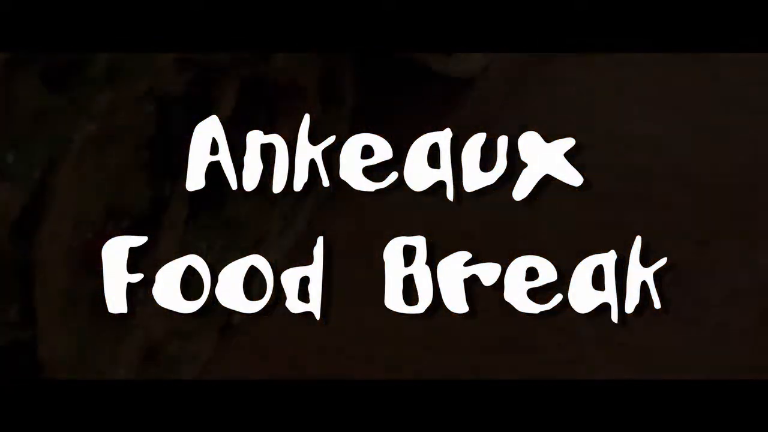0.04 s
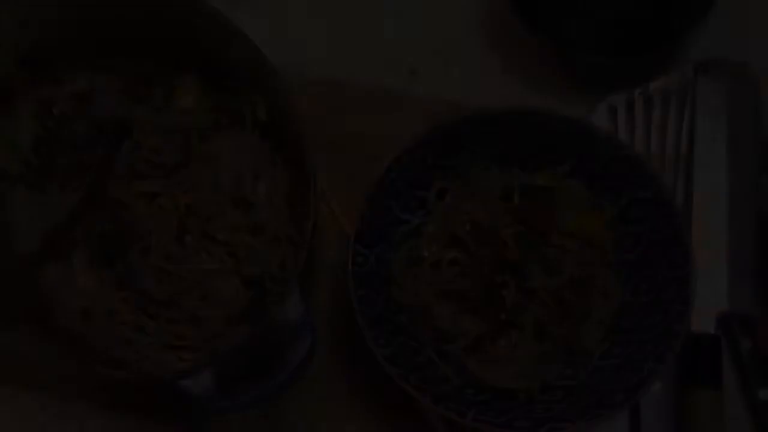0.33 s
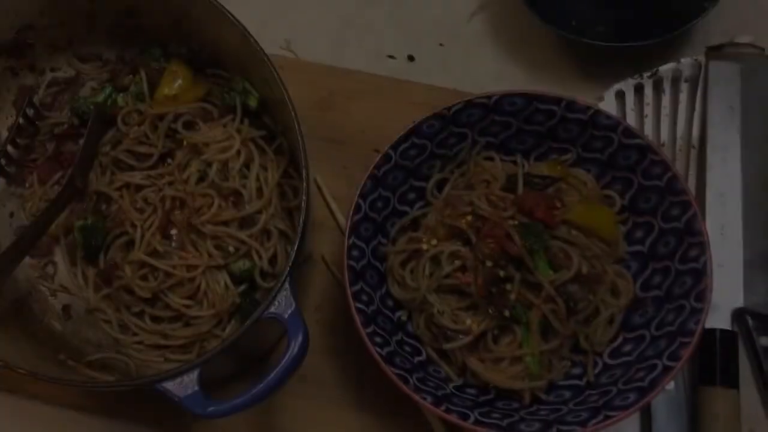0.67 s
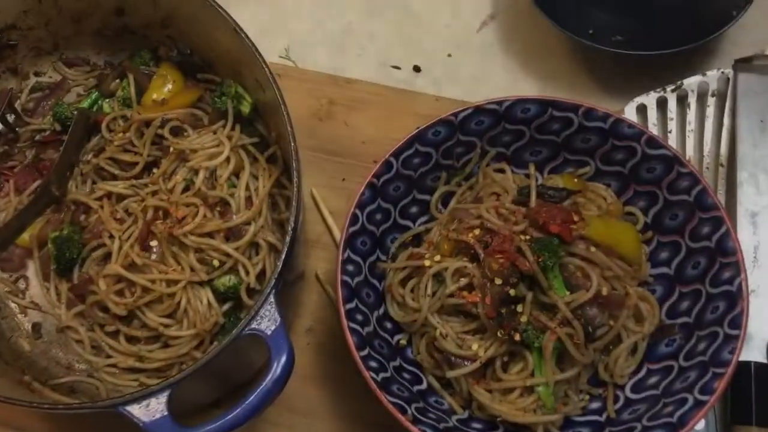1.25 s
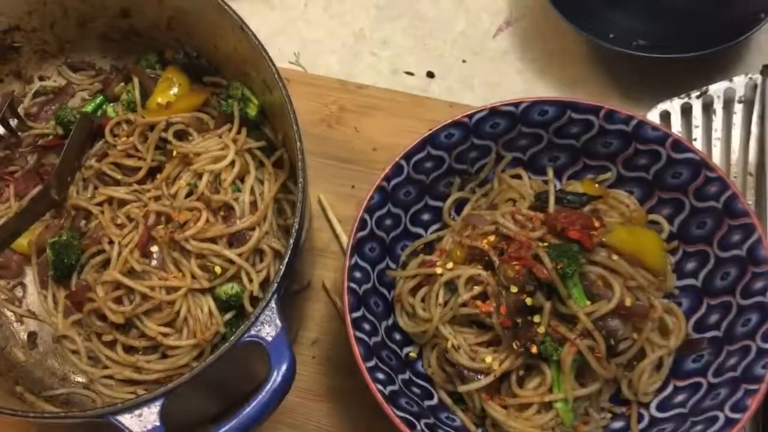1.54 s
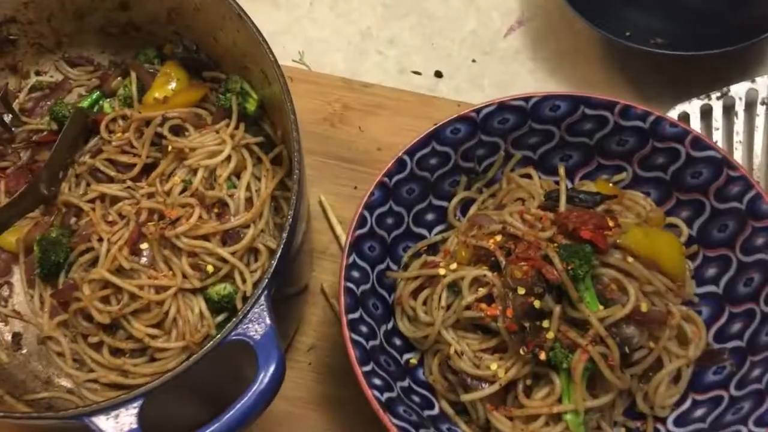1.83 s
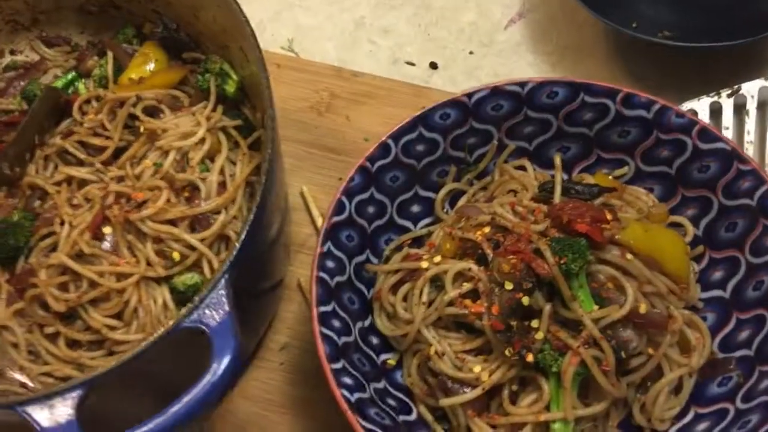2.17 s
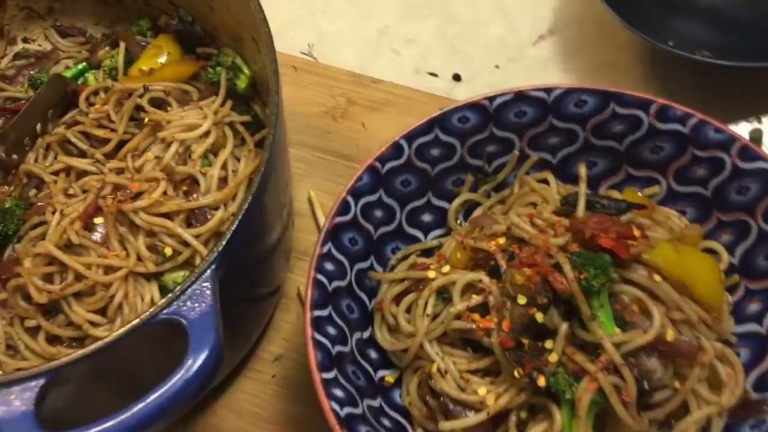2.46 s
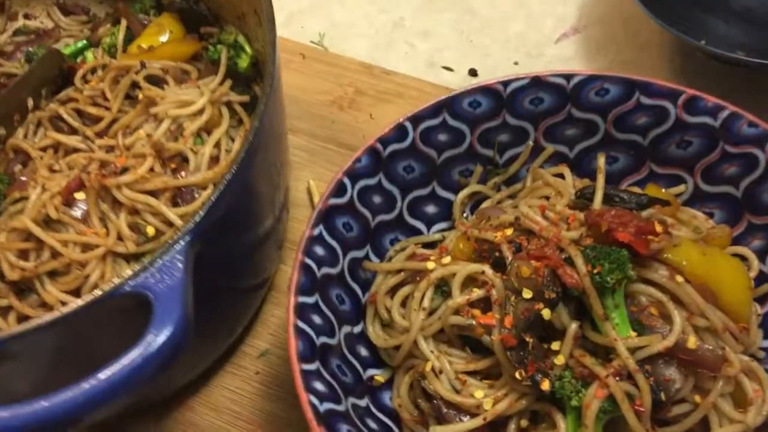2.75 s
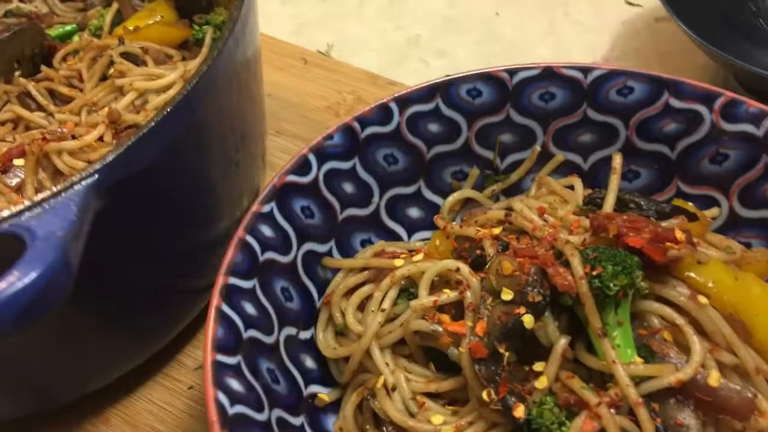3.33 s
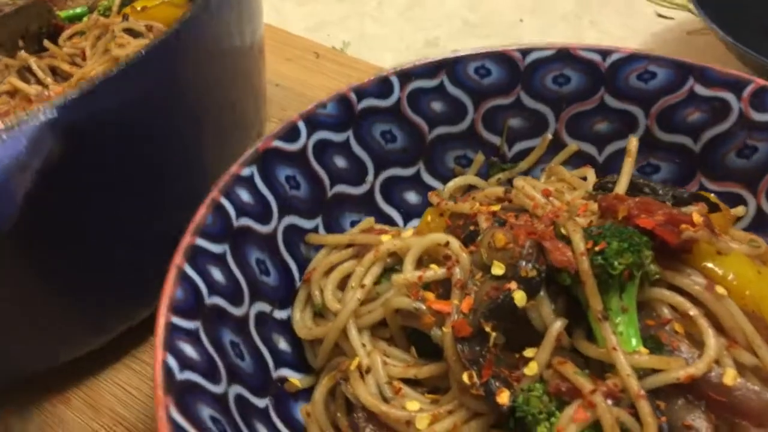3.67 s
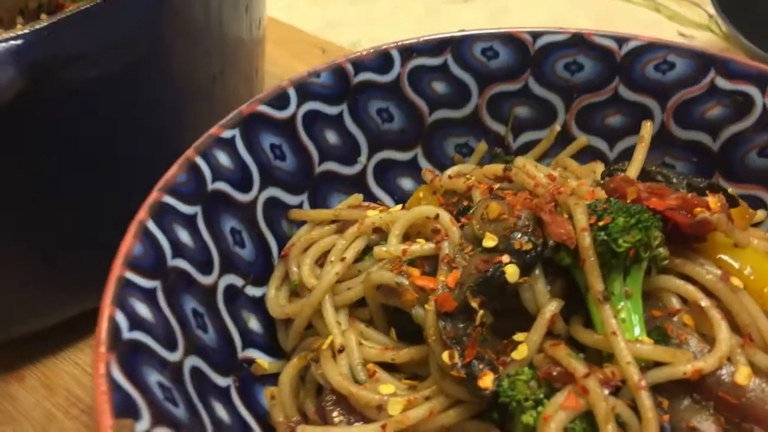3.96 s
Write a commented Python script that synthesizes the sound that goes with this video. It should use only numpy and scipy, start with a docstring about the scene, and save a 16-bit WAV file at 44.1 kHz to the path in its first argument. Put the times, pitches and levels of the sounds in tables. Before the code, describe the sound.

A steady sizzle of hot fat fades in, heard near the pan in a small, slightly echoing kitchen. A fan rushes and hums underneath, sharp little spits come at random, and the fan's hollow note swells near the end.

```python
"""After a moment of silence, a small kitchen fades in: a fan rushes and hums, and food sizzles in a pan.
The steady sizzle is thousands of tiny bubbles bursting in the hot fat, echoed by the room.
From about 1.5 s on, a larger bubble spits now and then.
Near the end, a hollow note in the rush of the fan swells and falls back."""
import sys
import numpy as np
from scipy import signal
from scipy.fft import rfft, irfft
from scipy.io import wavfile
from scipy.ndimage import uniform_filter1d

SR = 44100
rng = np.random.default_rng(int(sys.argv[2]) if len(sys.argv) > 2 else 0)


def put_to_file(sound):
    """Save the sound as 16-bit audio at rate SR, in the file named by the first command-line argument."""
    columns = np.atleast_2d(sound).T  # one column per channel
    safe = np.clip(columns, -1, 1)
    whole_steps = np.round(safe * 32767)
    wavfile.write(sys.argv[1], SR, whole_steps.astype(np.int16))


N = 176400
HZ = np.fft.rfftfreq(N, 1 / SR)  # the frequency of each point in a spectrum

# How strong the sizzle is from bass to treble: (frequency [Hz], level [dB])
SIZZLE_COLOUR = [(100, -47), (300, -19.5), (600, -7.5), (1500, -2), (2600, -1.5), (4000, -1), (6000, -0.5),
                 (8200, -0.5), (9200, -2), (10800, -3.5), (13200, -8.5), (16000, -10)]


def amp(db):
    """Turns decibels into a factor to multiply a sound by."""
    return 10 ** (np.asarray(db) / 20)


def unit(x):
    """Scales a signal to an average strength (rms) of 1."""
    return x / np.sqrt(np.mean(x ** 2) + 1e-20)


def curve(points):
    """Joins (frequency, value) points into a curve with a value at every frequency."""
    hz, value = np.transpose(points)
    return np.interp(np.log(HZ + 1), np.log(hz), value)


def resonance(hz, width_hz):
    """A bump of height 1 around one frequency."""
    return 1 / (1 + (2 * (HZ - hz) / width_hz) ** 2) ** 2


def drift(rate_hz):
    """A random wobble, mostly slower than the given rate."""
    spectrum = rfft(rng.standard_normal(N)) * (HZ > 1) / np.sqrt(HZ + 1)
    return unit(irfft(spectrum / (1 + (HZ / rate_hz) ** 2) ** 2, N))


def surrounding_noise():
    """Left and right spectra of noise from all around: alike in the bass, unlike in the treble."""
    # How alike the two sides are: (frequency [Hz], likeness [0 to 1])
    likeness = [(50, 0.9), (500, 0.96), (1100, 0.9), (2000, 0.79), (3000, 0.51), (5000, 0.26), (9000, 0.13),
                (16000, 0)]
    alike = curve(likeness)
    a, b = rfft(rng.standard_normal((2, N)))
    mid, side = a * np.sqrt((1 + alike) / 2), b * np.sqrt((1 - alike) / 2)
    return np.array([mid + side, mid - side])


def motor_hum(waver_hz=2.5):
    """The fan's motor hums with a few wavering tones; the lowest two are so close that they throb."""
    # The motor's tones: (pitch [Hz], level [dB])
    tones = [(118.5, -71), (120.2, -88.5), (145.3, -78), (193.5, -60.5)]
    t = np.arange(N) / SR
    hum = np.zeros(N)
    for hz, db in tones:
        loudness = 1 + 0.11 * drift(waver_hz)
        phase = 2 * np.pi * hz * t + 0.63 * drift(waver_hz)
        hum += amp(db) * unit(loudness * np.sin(phase))
    return hum


def fan_rush():
    """Air rushes through the fan, with a hollow note that swells near the end."""
    # How strong the rush is from bass to treble: (frequency [Hz], level [dB])
    rush_colour = [(20, -28), (35, -26), (50, -15), (70, -21), (110, -14), (170, -12), (205, -4),
                   (235, -0.5), (290, -4.5), (450, 2), (840, 1.5), (1150, 0.5), (1550, -1), (2600, -5),
                   (5000, -4), (16000, -35)]
    # How loud the hollow note is: (time [s], level [dB])
    note_levels = [(1, -57), (2.8, -57.5), (3.5, -51), (4, -55.5)]
    rush = unit(irfft(surrounding_noise() * amp(curve(rush_colour)), N))
    note = unit(irfft(surrounding_noise() * resonance(1032, width_hz=134), N))
    note_db = np.interp(np.arange(N) / SR, *np.transpose(note_levels))
    return amp(-45.5) * rush + amp(note_db) * note


def kitchen_echo(sound, echo_s=0.34, level_db=0.83):
    """The echoes of all the bubbles blur into a noise that follows the sizzle and dies away."""
    decay = amp(-60 * np.arange(N) / SR / echo_s) ** 2  # falls 60 dB in echo_s
    decay = rfft(decay / decay.sum())
    source = rfft(sound.mean(0))
    noise = surrounding_noise() * amp(curve(SIZZLE_COLOUR))
    edges_hz = [0, *np.geomspace(1200, 11000, 6), SR / 2]
    echo = np.zeros((2, N))
    for low, high in zip(edges_hz, edges_hz[1:]):
        band = (HZ >= low) & (HZ < high)
        power = irfft(source * band, N) ** 2
        lingering = irfft(rfft(power) * decay, N)
        echo += np.sqrt(abs(lingering)) * unit(irfft(noise * band, N))
    return amp(level_db) * echo


def burst(hz, cycles):
    """One bubble bursts: a sudden tone that falls to about a third after the given number of cycles."""
    turns = hz * np.arange(2048) / SR
    return np.sin(2 * np.pi * turns) * np.exp(-turns / cycles)


def bubbles(per_s, spread_db, cycles, pitch_count=40):
    """Bubbles of many pitches and sizes burst at random moments across the pan."""
    pitches = np.geomspace(700, 15500, pitch_count)
    shares = np.sqrt(pitches) / np.sqrt(pitches).sum()  # high pitches come more often
    swarm = np.zeros((2, N))
    for hz, share in zip(pitches, shares):
        chance = rng.random(N) / (share * per_s / SR)
        starts = np.flatnonzero(chance < 1)
        sizes = np.minimum(-np.log(chance[starts]), 3.2)  # many small, few large, none huge
        clicks = np.zeros(N)
        clicks[starts] = amp(spread_db * sizes) * (-1) ** starts
        sides = amp(1.5 * rng.standard_normal() * np.array([[.5], [-.5]]))  # a little left or right
        swarm += sides * signal.oaconvolve(clicks, unit(burst(hz, cycles)))[:N] * hz ** (1 / 4)
    # Even out the spectrum, then give it the colour of the sizzle.
    spectrum = rfft(swarm)
    outline = np.sqrt(uniform_filter1d((abs(spectrum) ** 2).mean(0), size=3001))
    return unit(irfft(spectrum / outline * amp(curve(SIZZLE_COLOUR)), N))


def spits(low_cut_hz=900):
    """Single larger bubbles of fat burst with sharp snaps."""
    # The larger bursts: (time [s], level [dB], pitch [Hz])
    large_bursts = [(1.4652, -30, 7500), (1.4720, -21, 4400), (1.4791, -11, 11000), (1.679, -17.5, 8500),
                    (1.783, -21, 5800), (1.790, -20, 4500), (1.826, -21, 6100), (2.36, -22, 6000),
                    (2.6047, -14, 11000), (2.6188, -15, 8500), (2.662, -17, 7800), (2.669, -15, 7460),
                    (2.7375, -19, 5550), (2.8105, -15.5, 9000), (2.825, -18, 13000), (2.872, -15.5, 10000),
                    (2.874, -19, 12500), (2.884, -15, 7100), (2.889, -21, 4970), (3.072, -17, 7500),
                    (3.163, -26, 3720), (3.22, -21, 8000), (3.480, -20.5, 3970), (3.587, -15, 5650),
                    (3.616, -15.5, 9500), (3.626, -16, 7540), (3.767, -16, 6100), (3.866, -18, 4470)]
    snaps = np.zeros(N)
    for start_s, db, hz in large_bursts:
        snap = amp(db) * burst(hz, cycles=1.7)
        slot = snaps[round(start_s * SR):][:len(snap)]
        slot += snap[:len(slot)]
    return signal.sosfilt(signal.butter(2, low_cut_hz, "high", fs=SR, output="sos"), snaps)


def sizzle(surge_db=0.43):
    """Fine fizz, coarser crackle and a few ringing bubbles boil up together in small surges."""
    fizz = amp(-40.5) * bubbles(per_s=6000, spread_db=2.6, cycles=1.73)
    crackle = amp(-41) * bubbles(per_s=650, spread_db=3.0, cycles=0.93)
    pings = amp(-47) * bubbles(per_s=110, spread_db=2.8, cycles=34, pitch_count=56)
    return (fizz + crackle + pings) * amp(surge_db * drift(rate_hz=30))


def scene():
    """The pan, its echo and the rushing air, coloured by the kitchen corner, over the motor's hum."""
    # Pitches that the pan and its corner boost or weaken: (frequency [Hz], width [Hz], gain [dB])
    resonances = [(525.7, 42, 6.5), (590, 22, -4), (616, 14, 6), (700, 25, 1.5), (759, 42, -10.5),
                  (880, 18, 2.5), (1034, 40, 2.5), (1099, 47, 6), (1203, 32, 4), (1294, 21, 4.5),
                  (1353, 123, -4), (1508, 37, 6), (1710, 190, 4), (1940, 31, 4.5), (1950, 70, -3),
                  (2165, 250, 2.5), (2650, 94, -1.5), (3080, 230, 3.5)]
    corner = amp(sum(db * resonance(hz, width_hz) for hz, width_hz, db in resonances))
    frying = sizzle() + spits()
    delay_s = np.array([[0], [5e-6]])  # the pan lies slightly left, so the right side hears it later
    direct = rfft(frying) * np.exp(-2j * np.pi * HZ * delay_s)
    background = rfft(kitchen_echo(frying) + fan_rush())
    return irfft((direct + background) * corner, N) + motor_hum()


def record(dry, silence_s=0.3, fade_s=0.96, top_hz=15750):
    """Makes the left side a little louder, fades in from silence and cuts the highest treble."""
    # How much louder the left is than the right: (frequency [Hz], level [dB])
    balance = [(40, .3), (200, 2), (800, 1.3), (2800, 0), (5500, 1), (10000, 1.2), (15000, 2.3)]
    stereo = irfft(rfft(dry) * amp(curve(balance) * np.array([[.5], [-.5]])), N)
    fade = np.clip((np.arange(N) / SR - silence_s) / fade_s, 0, 1)
    treble_cut = signal.firwin(511, top_hz, window=("kaiser", 9), fs=SR)
    return signal.oaconvolve(stereo * fade, treble_cut[None], "same")


dry = scene()
out = record(dry)
put_to_file(out)
```